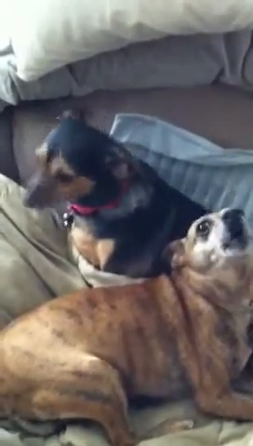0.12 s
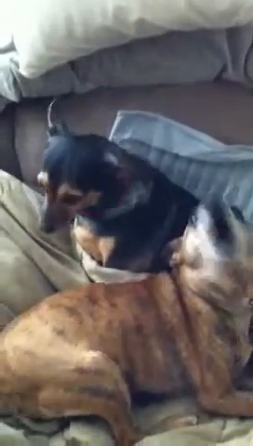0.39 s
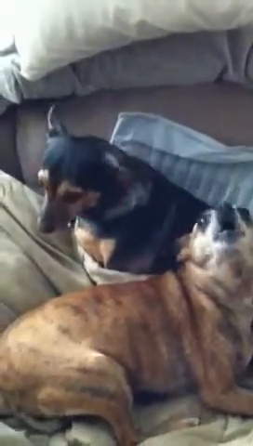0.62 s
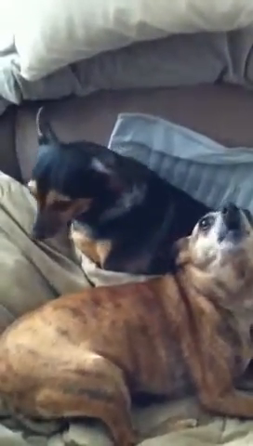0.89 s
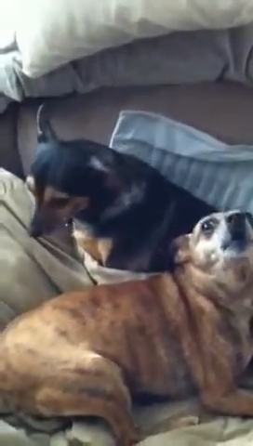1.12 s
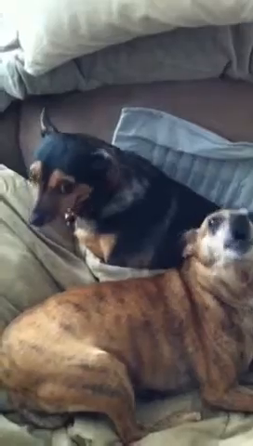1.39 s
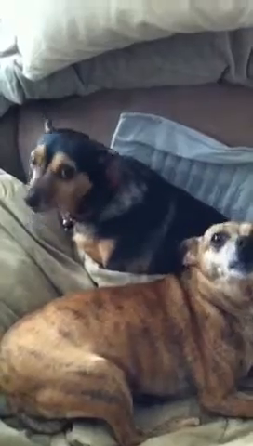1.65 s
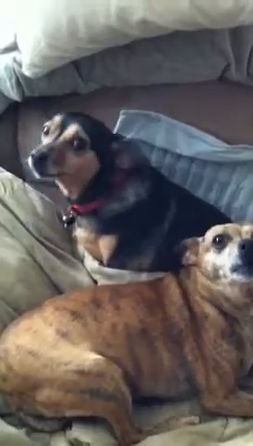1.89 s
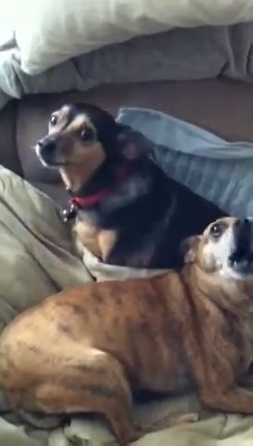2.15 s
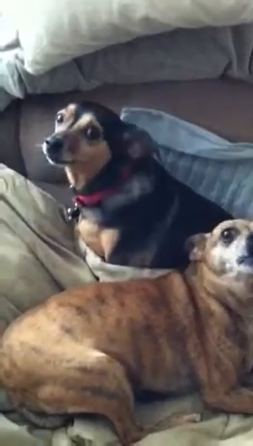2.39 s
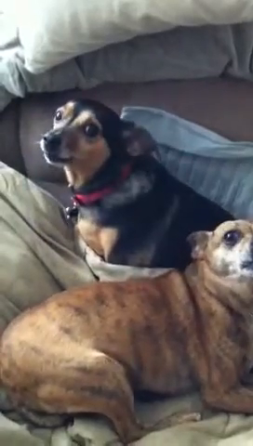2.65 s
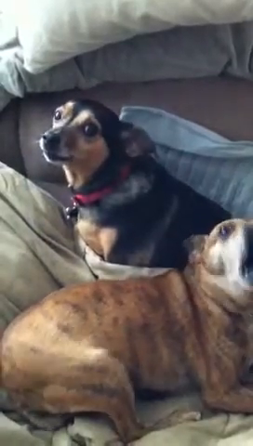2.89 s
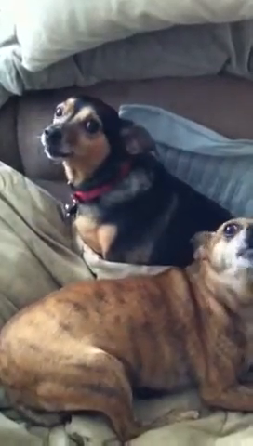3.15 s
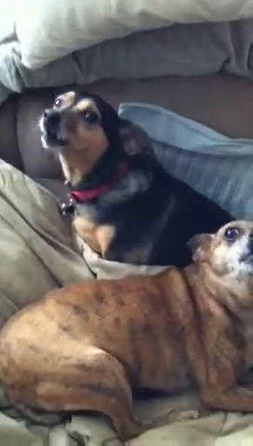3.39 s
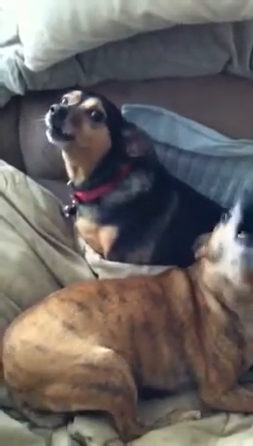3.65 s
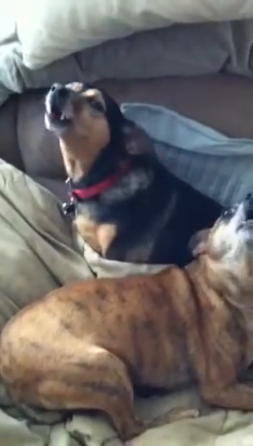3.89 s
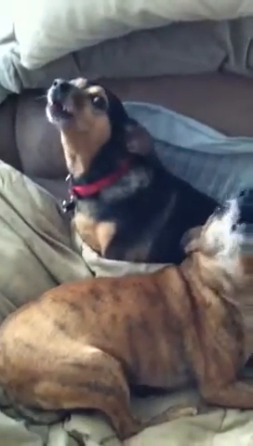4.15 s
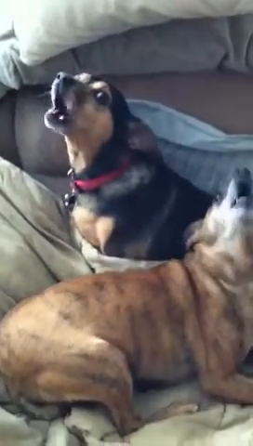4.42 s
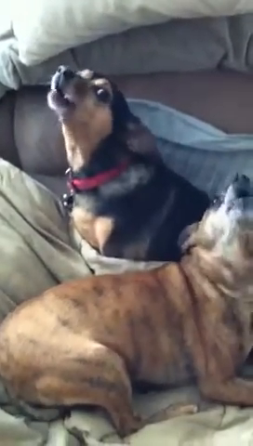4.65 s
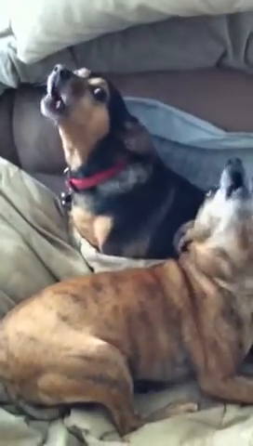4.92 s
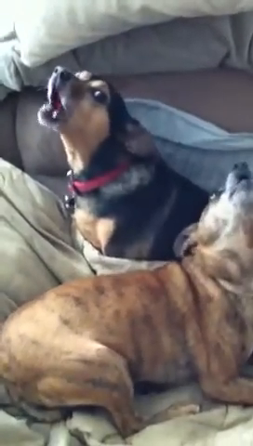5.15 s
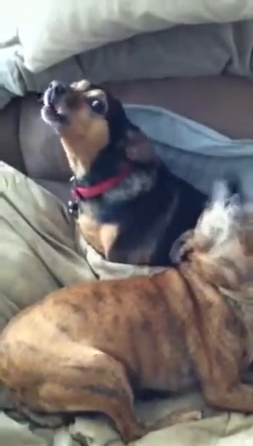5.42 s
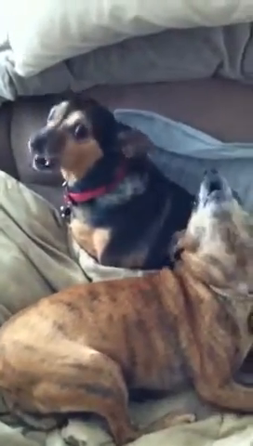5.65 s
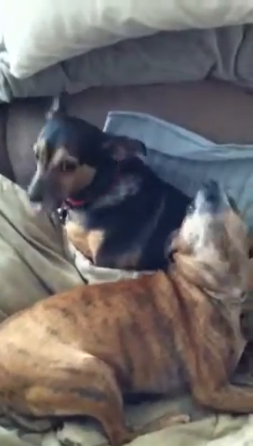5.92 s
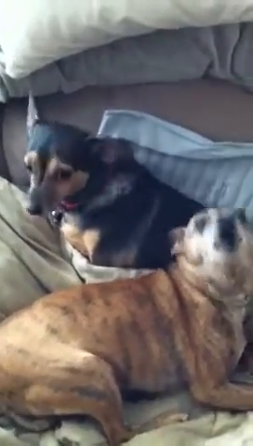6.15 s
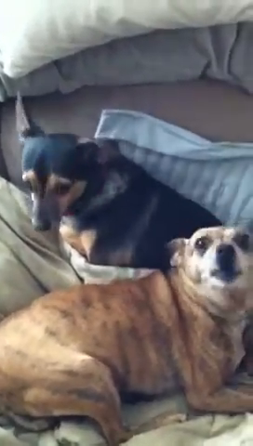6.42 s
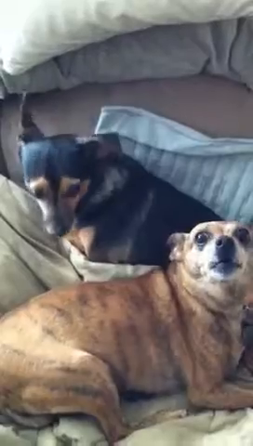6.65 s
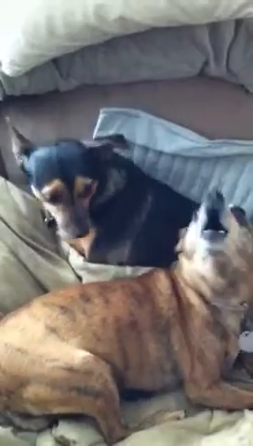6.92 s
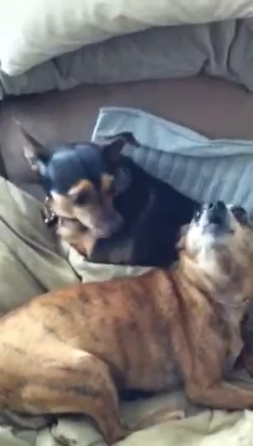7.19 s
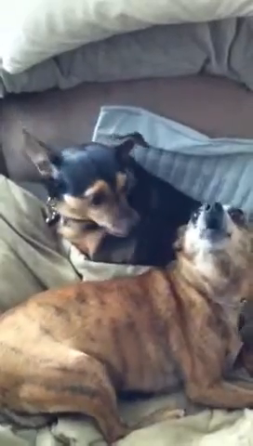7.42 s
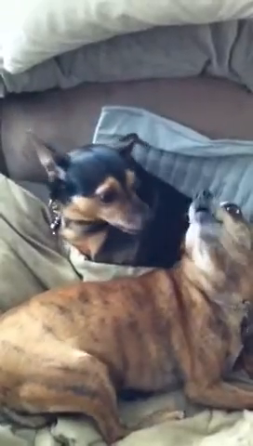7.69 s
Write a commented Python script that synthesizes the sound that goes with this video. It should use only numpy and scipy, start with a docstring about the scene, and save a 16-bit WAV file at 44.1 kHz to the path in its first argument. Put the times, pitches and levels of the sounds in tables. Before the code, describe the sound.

Three small dogs vocalise together indoors: repeated torn yelping barks in front, a low wavering howl, sliding whines, and faint collar tags ticking.

```python
"""A small dog barks again and again: each bark is a clean rising yelp that tears into rasp, squeak and bursts
of air. A second dog howls low over a brief grumble; a third whines in wide, sometimes overlapping glides, with
held whimpers and thin whistles. Voices are a strong fundamental plus overtones weighed by throat and muzzle,
with breath noise. Collar tags tick faintly as decaying sines; a furnished room answers with sparse reflections
over a quiet hush. Something hard rings along with the barks; a limiter holds the loudest peaks."""
import sys
import numpy as np
from scipy import signal
from scipy.fft import rfft, irfft, next_fast_len
from scipy.io import wavfile
from scipy.ndimage import uniform_filter1d, minimum_filter1d

SR = 44100
rng = np.random.default_rng(int(sys.argv[2]) if len(sys.argv) > 2 else 0)


def magnitude_from_level(level_db):
    """Linear magnitude for a level in decibels (20 dB per decade)."""
    exponent = np.asarray(level_db, float) / 20
    return 10 ** exponent


def dump(signal):
    """Clip the signal to [-1, 1] and save it as 16-bit WAV at the path in sys.argv[1]."""
    limited = np.clip(np.atleast_2d(signal).T, -1, 1)
    pcm = np.round(limited * 32767).astype(np.int16)
    wavfile.write(sys.argv[1], SR, pcm)


N = 343980
EDGE_HZ = 15750  # upper band limit

# Muzzle resonances weighing the overtones of howls and whimpers: pitch_hz, relative_db
MUZZLE = [(1300, 8), (1900, -6), (2740, 1), (3400, -11), (4100, -3), (4800, -18.5), (5500, -33.5),
          (6600, -18), (11000, -22.5), (15500, -45)]
# Colour of bark overtones, rasp and breath: pitch_hz, relative_db
RASP = [(380, -53), (600, -11.5), (800, -35), (1400, -10), (1920, -8.5), (2300, -17), (3200, -15.5),
        (4300, -27.5), (5770, -45), (7200, -37), (11000, -42), (15600, -44)]


def evened(x):
    """Scales to rms 1."""
    return x / np.sqrt(np.mean(abs(x) ** 2) + 1e-20)


def read(points, hz):
    """Interpolates a (Hz, value) table on a log-frequency axis."""
    f, value = np.transpose(points)
    return np.interp(np.log(hz + 1), np.log(f + 1), value)


def add(mix, s, sound):
    """Mixes a sound in at time s."""
    part = mix[round(s * SR):][:len(sound)]
    part += sound[:len(part)]


def drift(count, hz):
    """Random wobble, rms 1: noise low-passed at hz."""
    settle = 4000  # samples of filter onset, discarded
    noise = rng.standard_normal(count + settle)
    return evened(signal.lfilter(*signal.butter(2, hz, fs=SR), noise)[settle:])


def coloured(points, gate):
    """Noise let through by a gate, then given a spectrum; rms 1."""
    size = next_fast_len(len(gate))
    colour = magnitude_from_level(read(points, np.fft.rfftfreq(size, 1 / SR)))
    noise = gate * rng.standard_normal(len(gate))
    return evened(irfft(rfft(noise, size) * colour, size)[:len(gate)])


def unfold(rows, rise_s, fall_s):
    """Start time, soft ends, and table columns at sample rate with rounded corners."""
    s, *columns = np.transpose(rows)
    t = np.arange(s[0], s[-1], 1 / SR)
    ends = np.clip(np.minimum((t - s[0]) / rise_s, (s[-1] - t) / fall_s), 0, 1)
    return s[0], ends, [uniform_filter1d(np.interp(t, s, c), size=250) for c in columns]


def stack(hz, first, count, colour, jitter, waver_db, waver_hz):
    """Harmonics weighed by a colour to total rms 1; each then swells and fades on its own."""
    turns = np.cumsum(hz * (1 + jitter * drift(len(hz), 55))) / SR
    k = np.arange(first, first + count)[:, None]
    weight = magnitude_from_level(read(colour, k * hz)) * (k * hz < EDGE_HZ)
    weight /= np.sqrt((weight ** 2).sum(0) / 2)
    knots = rng.standard_normal((round(len(hz) / SR * waver_hz) + 2, count)).T
    at = np.linspace(0, knots.shape[1] - 1, len(hz))
    waver = np.array([np.interp(at, np.arange(len(row)), row) for row in knots])
    weight *= magnitude_from_level(waver_db * waver)
    phase = k * turns + rng.random(k.shape)
    return (weight * np.cos(2 * np.pi * phase)).sum(0), turns


def folds(hz, low_db, over_db, colour, jitter, shimmer):
    """Vocal folds: a strong fundamental and overtones weighed by throat and muzzle."""
    overtones, turns = stack(hz, first=2, count=22, colour=colour, jitter=jitter, waver_db=6.0, waver_hz=18)
    fundamental = np.sqrt(2) * np.cos(2 * np.pi * turns)
    tone = magnitude_from_level(low_db) * fundamental + magnitude_from_level(over_db) * overtones
    return tone * (1 + shimmer * drift(len(hz), 84)), turns


def note(rows, over_db, colour, jitter, shimmer, breath_db):
    """A held or gliding voice with a little air; airier and unsteady when the pitch drops fast."""
    break_db, break_jitter, break_octaves_per_s = 9, .02, 16
    s, ends, (hz, low_db) = unfold(rows, 0.002, 0.0066)
    hz = uniform_filter1d(hz, size=600, mode="nearest")  # pitch cannot turn sharply
    fall_octaves_per_s = -np.gradient(np.log2(hz)) * SR
    breaking = uniform_filter1d(np.clip(fall_octaves_per_s / break_octaves_per_s, 0, 1), size=1500)
    tone, _ = folds(hz, low_db, low_db + over_db - 4 * breaking, colour,
                    jitter + break_jitter * breaking, shimmer)
    fitful = coloured(RASP, ends * magnitude_from_level(5 * drift(len(hz), 30)))
    breath = evened(np.gradient(np.gradient(fitful)))  # turbulence is brighter than the voice
    return s, ends * (tone + magnitude_from_level(low_db + over_db + breath_db + break_db * breaking) * breath)


def hum(rows, count):
    """A faint tone with count equal harmonics and slight pitch jitter."""
    s, ends, (hz, db) = unfold(rows, 0.0029, 0.0052)
    turns = np.cumsum(hz * (1 + 0.008 * drift(len(hz), 88))) / SR
    return s, ends * magnitude_from_level(db) * sum(np.cos(2 * np.pi * k * turns) for k in range(1, count + 1))


def quiet_room():
    """Steady coloured noise whose level wanders slowly."""
    # pitch_hz, relative_db
    hush_colour = [(100, -27), (170, -14), (728, -15), (3000, -22.5), (10800, -22), (15500, -29)]
    return magnitude_from_level(-67.5) * coloured(hush_colour, magnitude_from_level(3.5 * drift(N, 3.6)))


def howling_dog():
    """Low howls from steady folds, with a chest grumble of three harmonics under the first; from 4.38 s the
    table also holds further whining notes, voiced with the howls' muzzle and settings, that overlap the other
    whines."""
    # one table a note: start_s, pitch_hz, fundamental_db; the first three are low howls, the last four further
    # # whining notes
    howl_notes = [
        [(0.0, 803.2, -17.5), (0.1, 786.3, -20.5), (0.165, 584.8, -23.5), (0.3, 650.7, -15.5),
         (0.75, 691, -21.5), (0.89, 635, -24)],
        [(0.885, 475.5, -44), (0.93, 431, -42.5), (1.1, 463.3, -42.5), (1.25, 539.7, -36.5), (1.33, 592, -38.5),
         (1.45, 470.4, -55)],
        [(1.47, 487.4, -42.5), (1.55, 672, -54.5), (1.64, 742, -41.5), (1.8, 647, -54.5), (2.1, 524.4, -51)],
        [(4.38, 1543, -37), (4.48, 1650, -22), (4.55, 1556, -23.5), (4.64, 1439, -54)],
        [(4.8, 1173, -31.5), (4.85, 1377, -14.5), (4.895, 1695, -18.5), (4.94, 1436, -28.5)],
        [(5.02, 886, -41), (5.12, 1252, -27), (5.25, 1260, -17.5), (5.33, 1389, -13.5), (5.42, 1211, -24),
         (5.5, 999, -25.5)],
        [(6.7, 1478, -59.5), (6.74, 1040, -41.5), (6.78, 905, -33), (6.85, 884, -38)],
    ]
    # one value a note: overtones_vs_fundamental_db
    howl_overtones_db = [-15, -28, -10.5, -25.5, -25.5, -19.5, -20]
    # start_s, pitch_hz, level_db
    grumble = [(0, 213.6, -49), (.11, 164.8, -57.5), (.16, 150, -70)]
    out = np.zeros(N)
    for rows, over_db in zip(howl_notes, howl_overtones_db):
        add(out, *note(rows, over_db, MUZZLE, jitter=.0025, shimmer=0.012, breath_db=-26))
    add(out, *hum(grumble, count=3))
    return out


def room(x):
    """Sparse reflections of random sign, each band dying at its own speed; three tails take turns."""
    # pitch_hz, t60_s
    band_t60 = [(500, 0.16), (2000, 0.23), (7000, 0.23)]
    taps = np.zeros((3, SR // 2))
    slots = np.arange(200, SR // 2 - 20, 20)  # one reflection per 20 samples
    at = slots + rng.integers(0, 20, (3, len(slots)))
    np.put_along_axis(taps, at, rng.choice([-1., 1.], at.shape), 1)
    hz, t, z = signal.stft(taps, SR, nperseg=256)
    decay = magnitude_from_level(-60 * t / read(band_t60, hz)[:, None])
    tails = signal.istft(z * decay, SR, nperseg=256)[1]
    cycles = np.arange(N) / SR * .4 + np.arange(3)[:, None] / 3  # 0.4 Hz, a third apart
    blend = np.sqrt(2 / 3) * np.cos(2 * np.pi * cycles)
    return signal.fftconvolve(x * blend, tails / np.linalg.norm(tails[0]), axes=1)[:, :N].sum(0)


def whimper(s, length_s, peak_db, first_hz, last_hz):
    """Pitch and level of a short note: a straight glide with an arch on top, loudest mid-note."""
    arch_share, ends_db = .04, -7
    along = np.linspace(0, 1, num=9)
    arch = np.sin(np.pi * along)
    hz = (first_hz + (last_hz - first_hz) * along) * (1 + arch_share * arch)
    return np.transpose([s + length_s * along, hz, peak_db + ends_db * (1 - arch) ** 2])


def whining_dog():
    """Wide gliding whines from unsteady folds, short held whimpers, and thin nasal whistles."""
    # one table a note: start_s, pitch_hz, fundamental_db
    whine_notes = [
        [(0.05, 1437, -33), (0.16, 1348, -26.5), (0.19, 1193, -31)],
        [(0.69, 1474, -34), (0.83, 1374, -27), (0.9, 1133, -31.5), (0.98, 891, -40.5)],
        [(2.655, 1410, -51), (2.7, 1219, -35.5), (2.735, 767.4, -42.5), (2.9, 814.7, -43.5),
         (2.96, 708.3, -37.5)],
        [(3.32, 1264, -44), (3.36, 2102, -39), (3.4, 1843, -38), (3.45, 917, -29), (3.49, 840, -32.5),
         (3.56, 939, -36), (3.66, 953, -33)],
        [(3.78, 746.5, -43.5), (3.85, 703, -40.5), (3.89, 1455, -31), (3.93, 1642, -19), (3.97, 1597, -26.5),
         (4.005, 1031, -35.5), (4.11, 875, -46), (4.15, 1003, -34.5), (4.2, 867, -38), (4.25, 838, -37)],
        [(4.53, 895, -30), (4.545, 1250, -24), (4.56, 1500, -25), (4.58, 1640, -18), (4.62, 1970, -32),
         (4.645, 1819, -54.5)],
        [(4.662, 1648, -18), (4.72, 1264, -31.5), (4.78, 892.6, -32), (4.82, 981, -42)],
        [(4.98, 1324, -40.5), (5.11, 1543, -24.5), (5.2, 1370, -20), (5.26, 1306, -44)],
        [(5.62, 1219, -21), (5.65, 1466, -24.5), (5.71, 1473, -26), (5.74, 1435, -17.5), (5.82, 1330, -92.5)],
    ]
    # one value a note: overtones_vs_fundamental_db
    whine_overtones_db = [-12, -20, -5, -6, -12.5, -17.5, -14.5, -14, -15]
    # snout resonances weighing the whines' overtones: pitch_hz, relative_db
    snout = [(1700, 9), (2300, -11), (3100, -7), (4200, -26), (5600, -34), (8000, -32.5), (15500, -56.5)]
    # start_s, length_s, peak_fundamental_db, first_pitch_hz, last_pitch_hz
    whimpers = [(1.63, 0.12, -46.5, 1213, 1028), (2.262, 0.15, -43, 672, 602),
                (6.385, 0.2, -41, 1257, 1102), (7.71, 0.073, -44.5, 732, 733)]
    # one table a whistle: start_s, pitch_hz, level_db
    whistles = [
        [(3.97, 1690, -37), (4.1, 1792, -40.5), (4.23, 1700, -41.5)],
        [(6.645, 6230, -53), (6.679, 7720, -37.5), (6.72, 8670, -77)],
    ]
    out = np.zeros(N)
    for rows, over_db in zip(whine_notes, whine_overtones_db):
        add(out, *note(rows, over_db, snout, jitter=0.0061, shimmer=.22, breath_db=-19))
    for row in whimpers:
        add(out, *note(whimper(*row), -14, MUZZLE, jitter=.004, shimmer=0.096, breath_db=-20.5))
    for rows in whistles:
        add(out, *hum(rows, count=1))
    return out


def bark_shape(s, effort_db, first_hz, tear_s, yelp_s):
    """Pitch, fundamental and rasp of one bark: a late tear means a softer start and slower climb."""
    bark_s, top_hz = .15, 1048
    climb_share, climb_power = 1.3, 1.4  # pitch climbs quickly, then levels off
    soft_db_per_s, swell_share = 558.5, 0.7  # the longer the run-up, the softer the start
    sag_db_per_s, cut_db_per_s = 59, 605.5  # the yelp sags, then cuts out
    # rasp bursts in at the tear, holds, dies
    rasp_level_db, clean_db, burst_s, rasp_s, rasp_db_per_s = -17.5, -26.5, 0.011, 0.089, 448.5
    t = np.linspace(0, bark_s, num=31)
    hz = top_hz - (top_hz - first_hz) * np.exp(-(t / (climb_share * tear_s)) ** climb_power)
    soft = np.clip(1.4 * (1 - t / (swell_share * tear_s)), 0, 1)
    full_db = effort_db - soft_db_per_s * tear_s * soft
    sag_db = sag_db_per_s * np.maximum(t - tear_s, 0)
    cut_db = cut_db_per_s * np.maximum(t - yelp_s, 0)
    clean = np.clip((tear_s - t) / burst_s, 0, 1)
    dying_db = rasp_db_per_s * np.maximum(t - rasp_s, 0)
    rasp_db = full_db + rasp_level_db + clean_db * clean - dying_db
    return np.transpose([s + t, hz, full_db - sag_db - cut_db, rasp_db])


def bark(rows):
    """A clean rising yelp; then the folds lock on about every third cycle, tear and squeak; air bursts out."""
    s, ends, (hz, low_db, rasp_db) = unfold(rows, 0.0075, 0.012)
    # once torn, the voice stays torn
    chaos = np.maximum.accumulate(np.clip(magnitude_from_level(rasp_db - low_db + 13.0), 0, 1))
    tone, turns = folds(hz, low_db, low_db - 11.5 - 13 * chaos, RASP,
                        0.012 + 0.003 * chaos, .04 + 0.38 * chaos)
    torn_hz = hz * rng.uniform(.31, .37)
    torn, _ = stack(torn_hz, first=2, count=30, colour=RASP, jitter=.014, waver_db=8.0, waver_hz=40)
    along = np.linspace(0, 1, len(hz))
    squeak_hz = rng.uniform(1230, 1320) * (1 + 0.13 * along)
    squeak, _ = stack(squeak_hz, first=1, count=6, colour=RASP, jitter=.005, waver_db=5.0, waver_hz=25)
    puffs = 0.25 + np.exp(-(turns % 1) / .5)  # one puff of air per fold cycle
    bursts = coloured(RASP, puffs * magnitude_from_level(1.7 * drift(len(hz), 40)))
    squeak_in = np.clip((along - .5) / .12, 0, 1)  # from mid-bark
    rasp = magnitude_from_level(3) * torn + magnitude_from_level(1) * bursts + magnitude_from_level(3) * squeak_in * squeak
    return s, ends * (tone + magnitude_from_level(rasp_db) * rasp)


def barking_dog():
    """Repeated barks, each shaped by its effort, first pitch and moment of tearing."""
    # start_s, effort_db, first_pitch_hz, voice_tears_after_s, yelp_lasts_s
    barks = [(0.45, -9, 810.3, .028, 0.11), (1.26, -10, 687, .034, .11), (2.09, -6, 817, .043, 0.067),
             (2.955, -5, 820.4, .025, 0.066), (3.641, -6.5, 810.5, .025, .09),
             (4.242, -7.5, 812, .027, 0.1), (4.868, -9.5, 780.8, .03, .11), (5.483, -8.5, 800.7, .026, .11),
             (6.059, -7, 766.7, .042, 0.078), (6.843, -9, 761, .03, .125), (7.514, -7, 783.4, .037, 0.079)]
    out = np.zeros(N)
    for row in barks:
        add(out, *bark(bark_shape(*row)))
    return out


def rattle(x, hz, t60_s):
    """Something hard nearby rings along at one pitch: a two-pole resonator."""
    r = np.exp(-np.log(1000) / (t60_s * SR))
    return signal.lfilter([1 - r], [1, -2 * r * np.cos(2 * np.pi * hz / SR), r ** 2], x)


def tags():
    """Small metal discs knock together and ring as decaying sines."""
    # ring modes: pitch_hz, relative_db, t60_s
    tag_modes = [(8600, -9.5, 0.2), (13400, 5, 0.16)]
    # time_s (the ring starts 2 ms earlier), level_db
    tag_ticks = [(0.9909, -61), (1.804, -55.5), (4.4677, -59.5), (5.0989, -50), (7.1028, -48.5),
                 (7.419, -68)]
    t, out = np.arange(8000) / SR, np.zeros(N)
    ring = sum(magnitude_from_level(db - 60 * t / t60_s) * np.sin(2 * np.pi * hz * t) for hz, db, t60_s in tag_modes)
    for s, db in tag_ticks:
        add(out, s - .002, magnitude_from_level(db) * ring)
    return out


def scene():
    """Three dogs, each with its own share of room, over rattle, tags and hush."""
    hush = quiet_room()
    howler, whiner, barker = howling_dog(), whining_dog(), barking_dog()
    wet = room(magnitude_from_level(-6.5) * howler + magnitude_from_level(-5.0) * whiner + magnitude_from_level(-7.5) * barker)
    ringing = magnitude_from_level(-8) * rattle(barker, hz=3160, t60_s=.4)
    return (howler + whiner + barker + wet + ringing + tags() + hush)[None]


def roll_off(x):
    """The treble ends steeply here."""
    return signal.sosfilt(signal.butter(12, 15710, fs=SR, output="sos"), x)


def record(dry):
    """A quick look-ahead limiter holds the loudest peaks; a linear-phase low-pass limits the band."""
    ceiling = .69
    peak = uniform_filter1d(-minimum_filter1d(-abs(dry), size=301), size=151)
    held = dry / np.maximum(peak / ceiling, 1)
    edge = signal.firwin(511, EDGE_HZ, window=("kaiser", 9), fs=SR)
    mix = signal.oaconvolve(held, edge[None], "same")
    return roll_off(mix)


dry = scene()
out = record(dry)
dump(out)
```